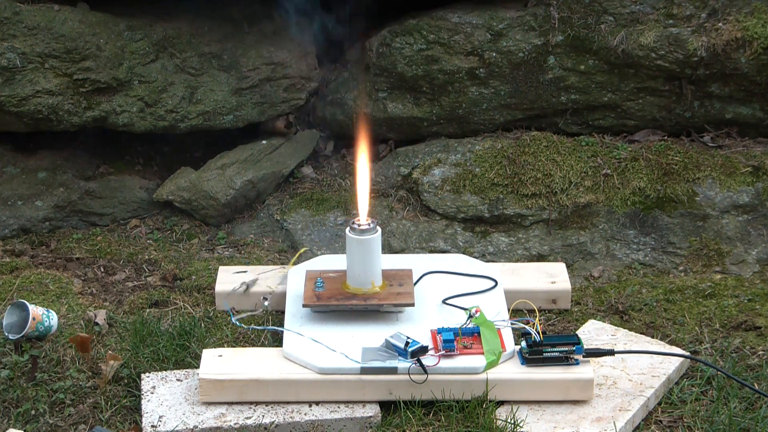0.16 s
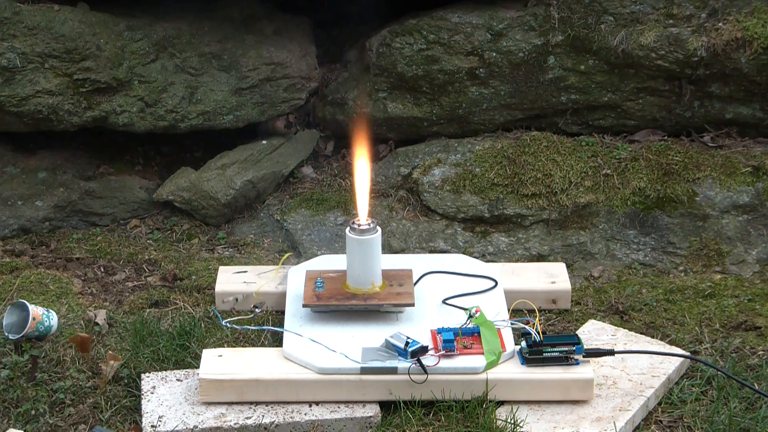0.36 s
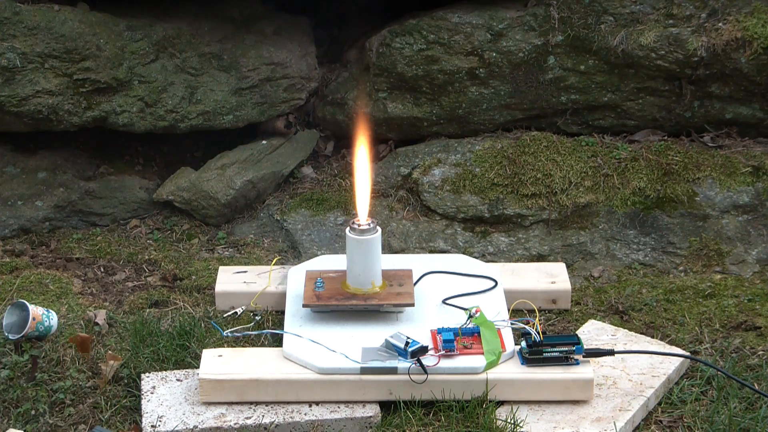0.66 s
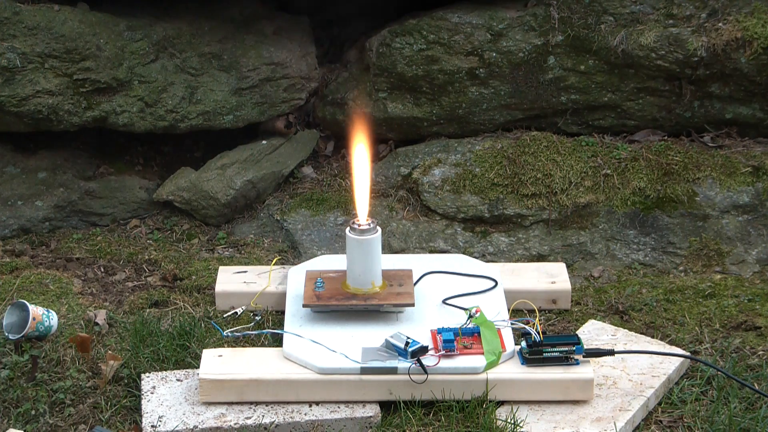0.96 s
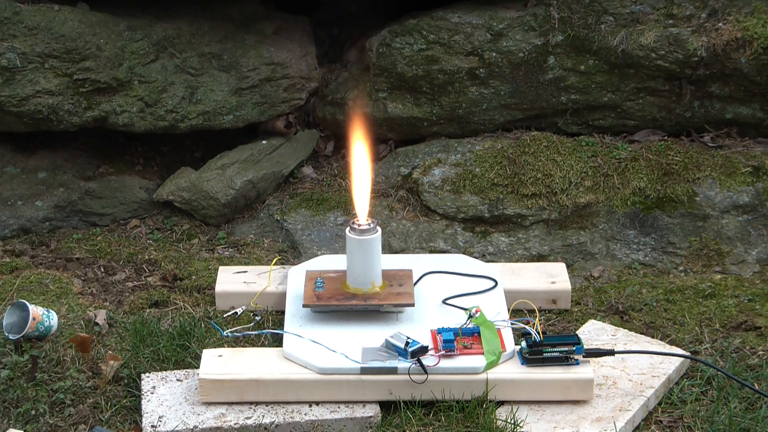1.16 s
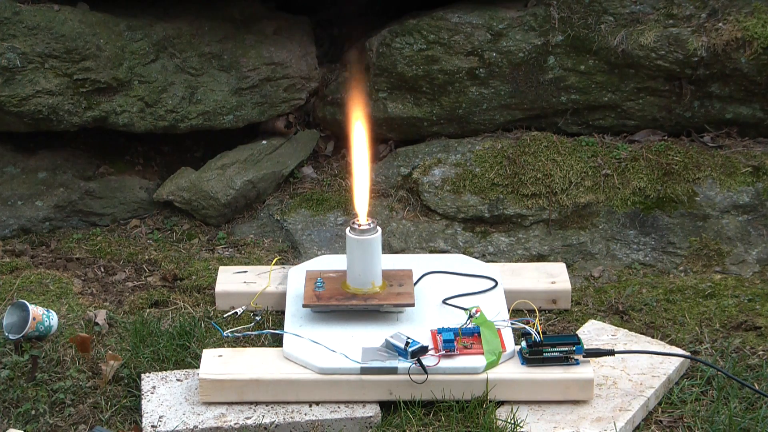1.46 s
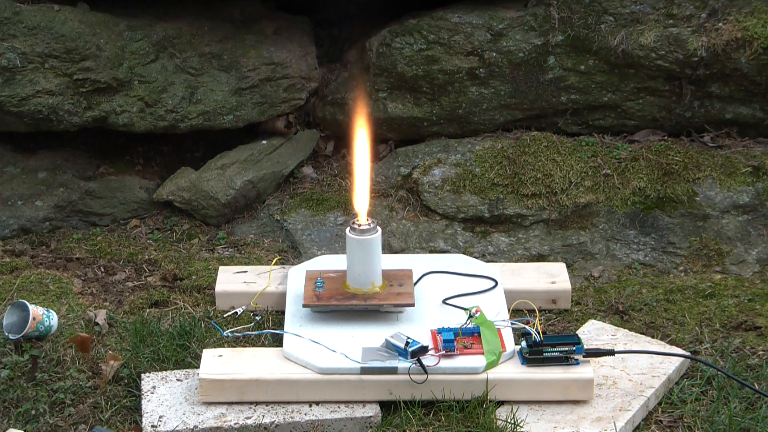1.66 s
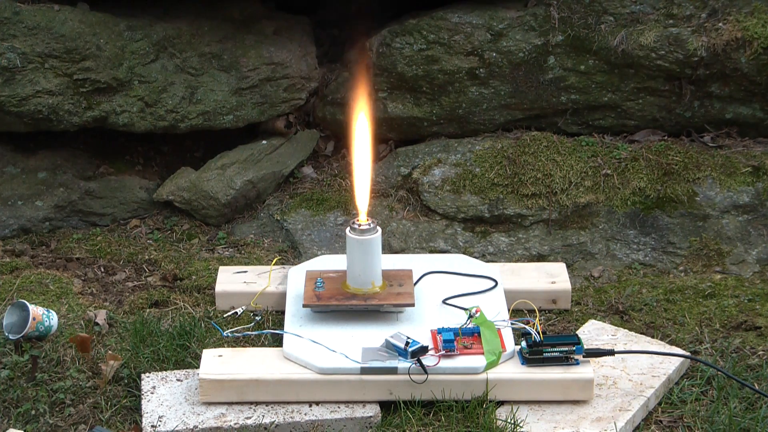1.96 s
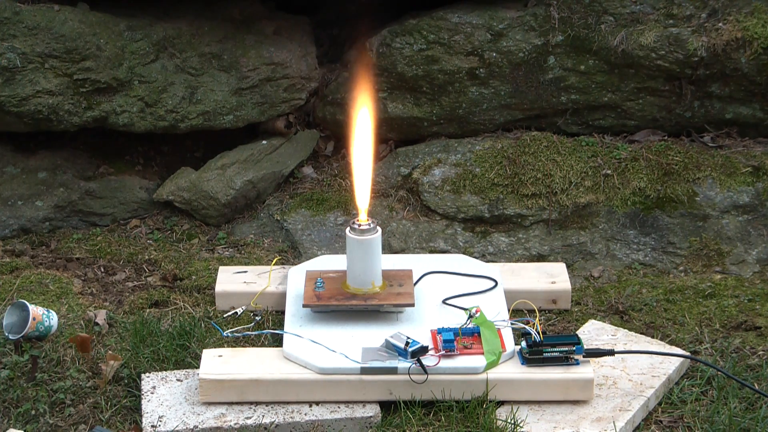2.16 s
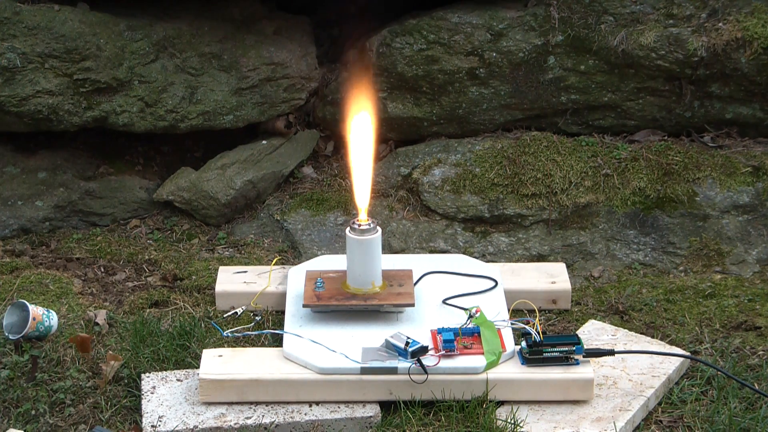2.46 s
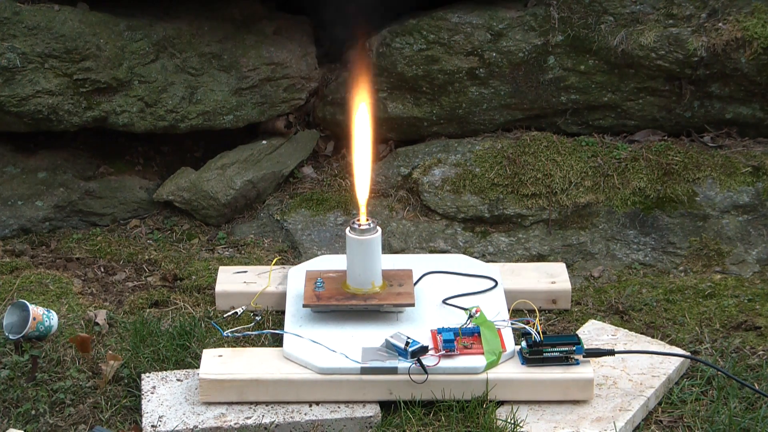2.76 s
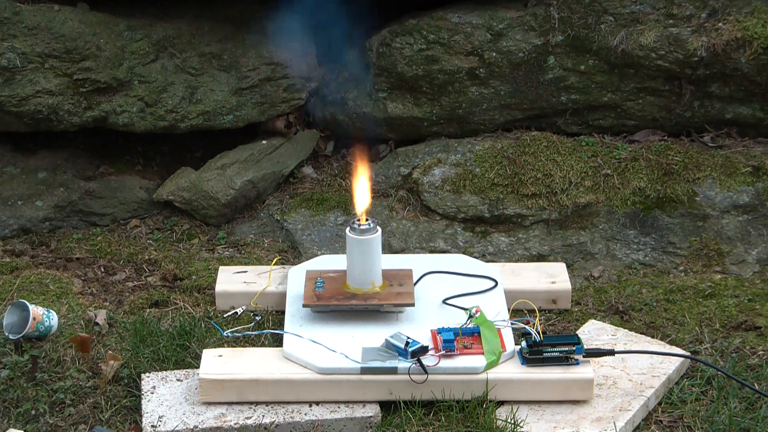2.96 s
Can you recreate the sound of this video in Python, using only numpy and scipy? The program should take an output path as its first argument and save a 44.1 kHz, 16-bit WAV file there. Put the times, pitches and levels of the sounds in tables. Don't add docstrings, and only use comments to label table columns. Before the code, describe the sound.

A small rocket motor chuffs and cracks at ignition, then blasts a loud, bright, hissing roar for nearly three seconds, distorting a close outdoor stereo microphone, before a short high whistle and sudden drop to faint flame flutter.

```python
import sys
import numpy as np
from scipy import signal
from scipy.fft import rfft, irfft
from scipy.io import wavfile
from scipy.ndimage import uniform_filter1d

SR = 44100
rng = np.random.default_rng(int(sys.argv[2]) if len(sys.argv) > 2 else 0)


def gain_from_db(level_db):
    decades = np.asarray(level_db, float) / 20
    return 10 ** decades


def unload_wav(signal):
    wavfile.write(
        sys.argv[1],
        SR,
        np.round(np.clip(np.atleast_2d(signal).T, -1, 1) * 32767).astype(np.int16),
    )


N = 136710

# (time [s], level [dB])
CHUFFS = [
    (0, -17),
    (.012, -27),
    (.022, -24),
    (.03, -19),
    (.056, -12.5),
    (.076, -17),
    (.085, -32),
    (.106, -29),
    (.124, -19),
]
# (time [s], level [dB])
BURN = [(0.133, -7), (.2, -13), (.5, -11), (1.0, -8.5), (1.5, -7.5), (2.0, -5), (2.5, -6.5), (2.88, -5.5),
        (2.94, -12), (2.973, -9.5), (2.987, -39), (3.0, -44), (3.1, -55)]
# (frequency [Hz], density [dB])
HISS_COLOUR = [(300, -30), (1200, -18.5), (2600, -13), (5000, -9), (7200, -7.5), (9500, -2), (12500, -4),
               (15500, -9.5)]
# (frequency [Hz], density [dB])
ROAR_COLOUR = [(20, -9), (60, -1.5), (200, -5.5), (700, -9.5), (1500, -2), (2600, 1.5), (5000, -0.5),
               (8000, -20)]
# (frequency [Hz], likeness [0-1])
JET_LIKENESS = [(100, 0.6), (1000, 1), (2700, 0.84), (4500, 0.66), (6100, 0.72), (7600, 0.94), (9500, 0.98),
                (14000, 0.91)]
# (time [s], level [dB])
KINDLING = [
    (0, -28),
    (.03, -21.5),
    (.07, -37),
    (.085, -28),
    (.1, -34.5),
    (.125, -20),
    (.16, -30),
    (.2, -60),
]
# (time [s], level [dB])
AFTERFLAME = [
    (2.966, -55),
    (2.977, -22),
    (2.989, -39),
    (3.02, -41),
    (3.03, -33),
    (3.05, -32),
    (3.068, -33),
    (3.085, -32),
    (3.1, -33),
]
# (frequency [Hz], density [dB])
FLAME_COLOUR = [(60, -8), (350, -10), (1700, -8), (2500, 2), (3200, -6), (5500, -11), (10000, -15),
                (14000, -36)]
# (frequency [Hz], likeness [0-1])
FLAME_LIKENESS = [(100, .75), (2000, 0.72), (8000, 0.18)]
# (time [s], pressure [full scale])
SWELL = [(0, 0), (2.55, .005), (2.75, .022), (2.9, .012), (3.0, -.014), (3.08, -.04), (3.1, -.037)]
# (time [s], peak level [dB])
POPS = [
    (.031, -25.5),
    (.0365, 2),
    (.0415, -19),
    (.053, -9.5),
]
# (time [s], left [full scale], right [full scale], recovery [s])
BUFFETS = [(1.2, .0, -0.043, 0.016), (1.3, 0, -0.008, .02), (1.41, -0.04, -0.063, 0.092),
           (1.6, -.04, -0.029, .02), (1.67, -0.021, -0.048, .04), (1.81, -0.06, -.02, 0.033),
           (2.035, 0.035, -0.047, 0.041), (2.19, -0.073, -.03, .01), (2.2, 0.21, 0.16, 0.038),
           (2.212, -0.04, -0.18, .03), (2.37, -0.041, .03, .04), (2.401, -0.12, -.11, 0.028),
           (2.454, -0.15, .04, 0.046), (2.529, 0.028, .06, .02), (2.6, 0.017, 0.074, .02),
           (2.662, 0.13, 0.013, 0.069), (2.672, 0.018, -0.14, 0.036), (2.715, -0.018, 0.14, 0.034),
           (2.87, 0.029, 0.056, .02)]
# (time [s], frequency [Hz], level [dB])
WHISTLE = [
    (2.934, 7050, -42),
    (2.943, 7000, -15),
    (2.949, 6980, -16),
    (2.955, 7010, -11),
    (2.965, 6880, -12),
    (2.972, 6620, -16),
    (2.98, 6450, -42),
]
# (delay [s], level [dB])
ECHOES = [(.045, -31), (.07, -21), (.094, -22), (.116, -26), (.135, -25)]
# (frequency [Hz], width [Hz], level [dB])
MIC_COLOUR = [(2830, 1850, 4.5), (4870, 950, 3.5), (5880, 680, -6), (9150, 3100, 4.5), (4060, 510, -0.5)]
# (frequency [Hz], level [dB])
PORT_TILT = [(500, -5.5), (2200, 3), (3500, 3.5), (6600, -4.5), (7700, 0), (9200, -3.8), (10300, .8),
             (14000, 0.7)]

ROAR_KNEE_DB = -9


def rms_one(x):
    return x / np.sqrt(np.mean(x ** 2) + 1e-20)


def in_time(rows):
    s, *columns = np.transpose(rows)
    return [np.interp(np.arange(N) / SR, s, column) for column in columns]


def at_hz(points, hz):
    table_hz, values = np.transpose(points)
    return np.interp(np.log(hz + 1), np.log(table_hz), values)


def drift(rate_hz):
    r = np.exp(-80 * np.pi * rate_hz / SR)
    noise = rng.standard_normal(N // 40 + 2002)
    slow = signal.lfilter([1], [1, -2 * r, r * r], noise)[2000:]
    return np.interp(np.arange(N) / 40, np.arange(len(slow)), rms_one(slow))


def turbulence(colour, likeness, shared_db, own_db, rate_hz):
    hz = np.fft.rfftfreq(N, 1 / SR)
    alike = np.clip(at_hz(likeness, hz), 0, 1)
    mid, side = rfft(rng.standard_normal((2, N)))
    pair = np.sqrt(1 + alike) * mid + np.sqrt(1 - alike) * side * [[1], [-1]]
    pair = gain_from_db(at_hz(colour, hz)) * pair
    octave = np.log2(hz + 1)
    together = drift(rate_hz)
    out = 0
    for centre in range(4, 16, 2):
        share = np.cos(np.pi / 4 * np.clip(octave - centre, -2, 2)) ** 2
        flicker = gain_from_db(shared_db * together + own_db * drift(2 * rate_hz))
        out = out + flicker * irfft(pair * share, N)
    return rms_one(out)


def resonance(x, hz, width_hz):
    r = np.exp(-np.pi * width_hz / SR)
    feed = np.array([1, 0, -1]) * (1 - r * r) / 2
    return signal.lfilter(feed, [1, -2 * r * np.cos(2 * np.pi * hz / SR), r * r], x + 1e-18)


def jet(strength_db):
    rise_db = strength_db - ROAR_KNEE_DB
    hiss = turbulence(HISS_COLOUR, JET_LIKENESS, shared_db=0.6, own_db=0.46, rate_hz=3.1)
    roar = turbulence(ROAR_COLOUR, JET_LIKENESS, shared_db=1.4, own_db=2.6, rate_hz=20.0)
    roar_db = -26 + np.where(rise_db > 0, 1.8, 0.8) * rise_db
    return gain_from_db(strength_db) * hiss + gain_from_db(roar_db) * roar


def lazy_flame():
    level_db, = in_time(KINDLING + [(2.95, -70)] + AFTERFLAME)
    return gain_from_db(level_db) * turbulence(FLAME_COLOUR, FLAME_LIKENESS, shared_db=3.5, own_db=0.8, rate_hz=9.7)


def rumble(strength_db):
    band = signal.butter(2, [18, 95], "band", fs=SR, output="sos")
    low = signal.sosfilt(band, rng.standard_normal((3, N)))
    level_db = -51 + 2.2 * np.clip(strength_db - ROAR_KNEE_DB, -3, 5)
    return gain_from_db(level_db) * rms_one(low[0] + 0.48 * low[1:])


def pops():
    clicks = np.zeros(N)
    for at, db in POPS:
        clicks[int(at * SR)] = 5 * gain_from_db(db) * rng.choice([-1, 1])
    return resonance(clicks, hz=2930, width_hz=3700)


def buffeting():
    gain, rise_s = 1.6, 0.002
    s = np.arange(N) / SR
    gusts, = in_time(SWELL)
    for at, left, right, recovery_s in BUFFETS:
        since = np.maximum(s - at, 0)
        push = (1 - np.exp(-(since / rise_s) ** 2)) * np.exp(-since / recovery_s)
        gusts = gusts + gain * np.array([[left], [right]]) * push
    return gusts


def whistle():
    hz, level_db = in_time(WHISTLE)
    s = np.arange(N) / SR
    phase = 2 * np.pi * np.cumsum(hz + 40.0 * drift(77.0)) / SR
    sounding = (s > WHISTLE[0][0]) * (s < WHISTLE[-1][0])
    shape = np.sqrt(2) * gain_from_db(level_db + 1.2 * drift(60.0)) * sounding
    tone = shape * np.sin(phase)
    octave = gain_from_db(-7) * shape * np.sin(2 * phase)
    return gain_from_db([[-1.5], [1.5]]) * (tone + octave) + far_walls(tone)


def far_walls(tone):
    echoes = np.zeros((2, N))
    for k, (delay_s, db) in enumerate(ECHOES):
        lags = (delay_s * SR + np.array([0, 2]) * (-1) ** k + 2).astype(int)
        for port, lag in enumerate(lags):
            echoes[port, lag:] += gain_from_db(db) * tone[:-lag]
    return echoes * gain_from_db(2.5 * drift(90.0))


def gulp():
    at_s, length_s = 3.085, 0.0092
    hollow = rms_one(resonance(rng.standard_normal(N), hz=1240, width_hz=500.0))
    return gain_from_db(-29) * np.exp(-((np.arange(N) / SR - at_s) / length_s) ** 2) * hollow


def microphones(x):
    right_lag_us = 10.6
    hz = np.fft.rfftfreq(N, 1 / SR)
    colour_db = sum(db / (1 + (2 * (hz - centre) / width) ** 2) for centre, width, db in MIC_COLOUR)
    gain = gain_from_db(colour_db + at_hz(PORT_TILT, hz) * np.array([[0.5], [-0.5]]))
    lag = np.exp(-2j * np.pi * hz * right_lag_us / 1e6 * np.array([[0], [1]]))
    return irfft(rfft(x) * gain * lag, N)


def scene():
    strength_db, = in_time(CHUFFS + BURN)
    through_air = microphones(jet(strength_db) + pops())
    wind = rumble(strength_db) + buffeting()
    return through_air + lazy_flame() + wind + whistle() + gulp()


def overload(x):
    clip_level, hardness = 0.34, 4
    return x / (1.5 + np.abs(x / clip_level) ** hardness) ** (1 / hardness) + 0.0024


def narrow(x):
    hz = np.fft.rfftfreq(N, 1 / SR)
    side = (x[0] - x[1]) / 2
    band = irfft(rfft(side) * (hz > 3330) * (hz < 5760), N)
    loud = np.clip(uniform_filter1d(x[0] ** 2, size=1024) / 0.003, 0, 1)
    return x - loud * band * (1 - gain_from_db(-3.5)) * [[1], [-1]]


def roll_off(x):
    return signal.sosfilt(signal.butter(12, 15350, fs=SR, output="sos"), x)


def record(dry):
    hz = np.fft.rfftfreq(N, 1 / SR)
    mix = irfft(rfft(narrow(overload(dry))) * (hz < 15270), N)
    return roll_off(mix)


dry = scene()
out = record(dry)
unload_wav(out)
```